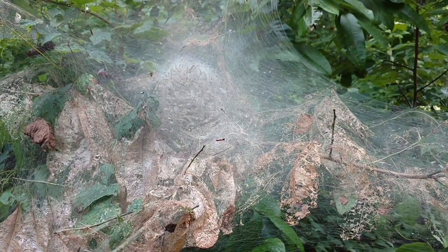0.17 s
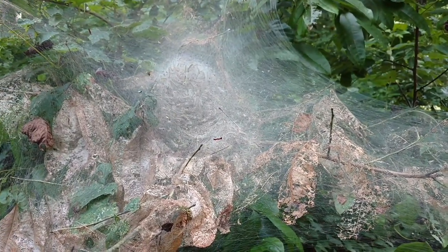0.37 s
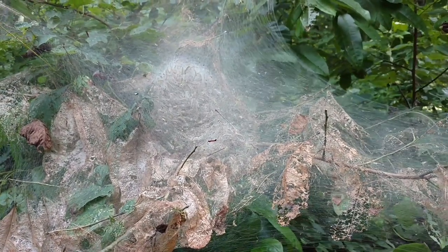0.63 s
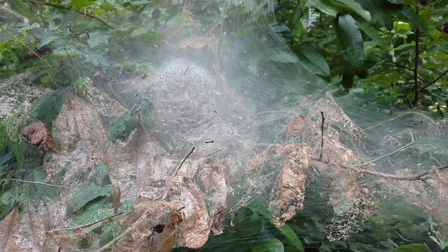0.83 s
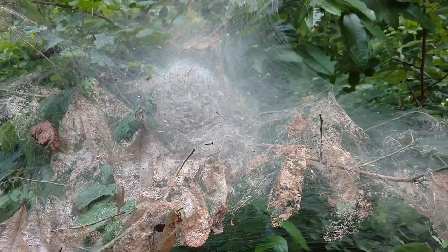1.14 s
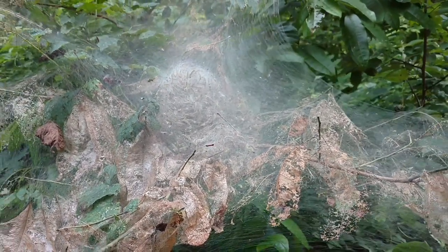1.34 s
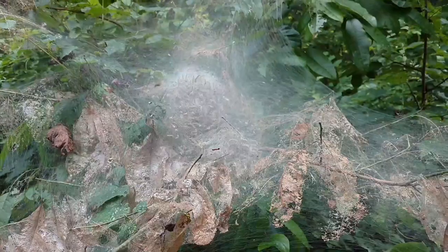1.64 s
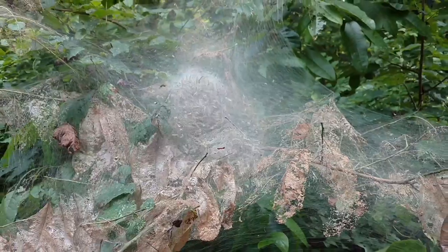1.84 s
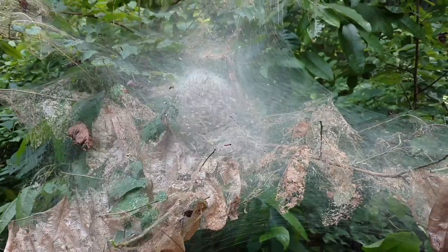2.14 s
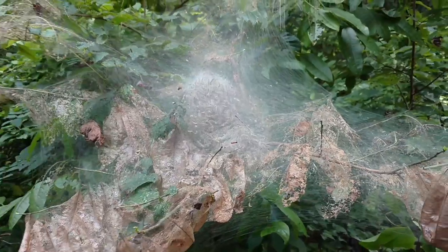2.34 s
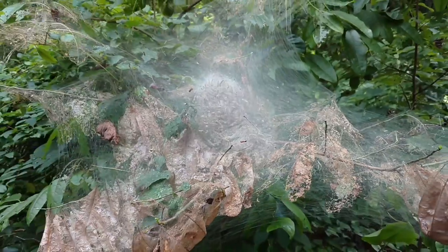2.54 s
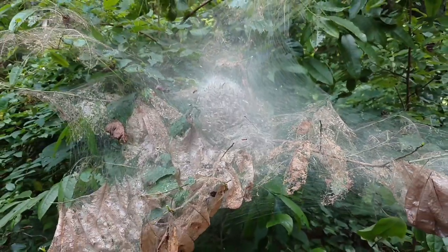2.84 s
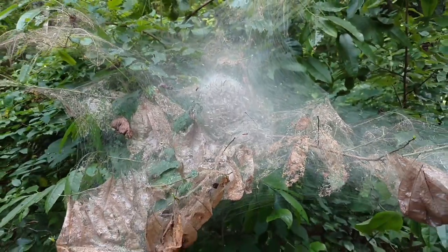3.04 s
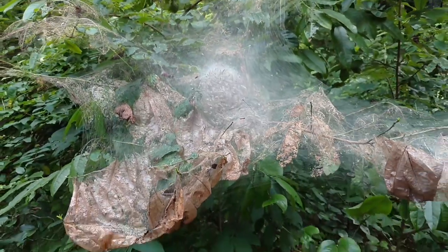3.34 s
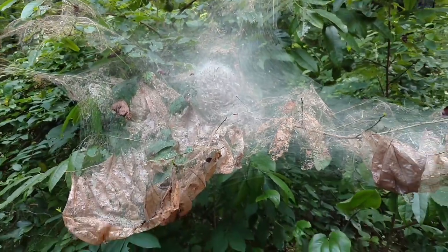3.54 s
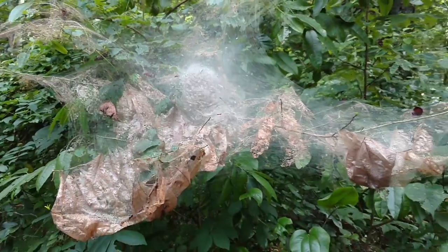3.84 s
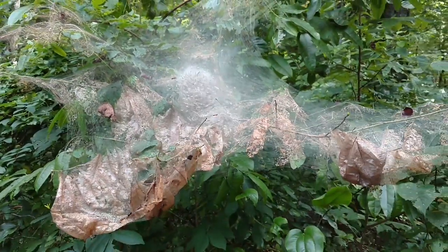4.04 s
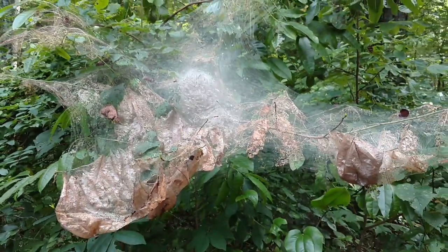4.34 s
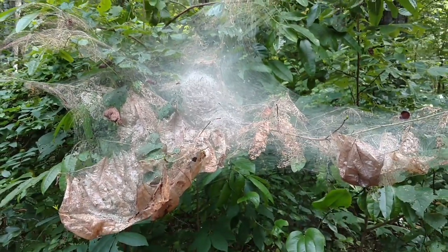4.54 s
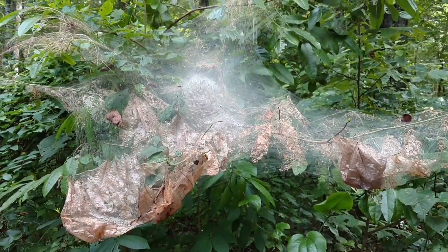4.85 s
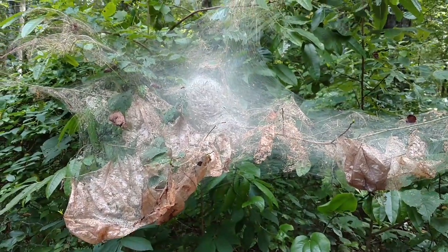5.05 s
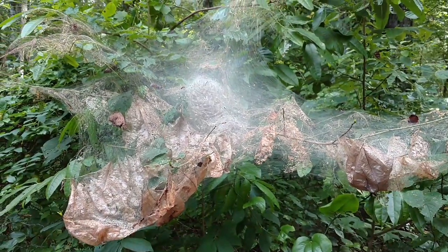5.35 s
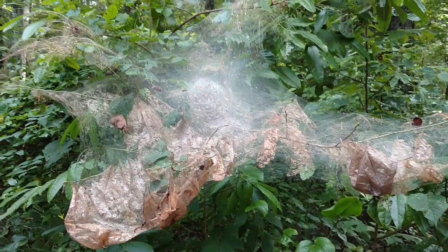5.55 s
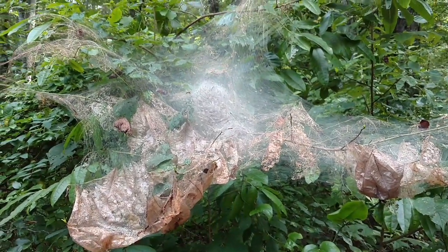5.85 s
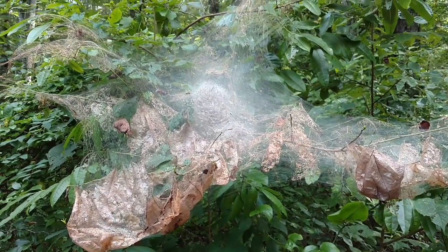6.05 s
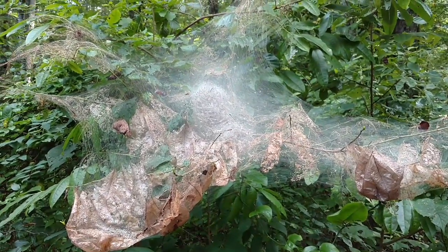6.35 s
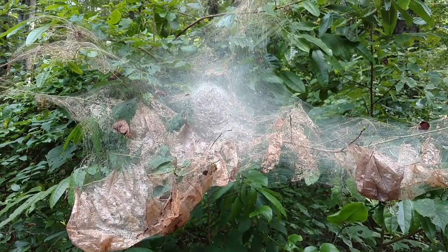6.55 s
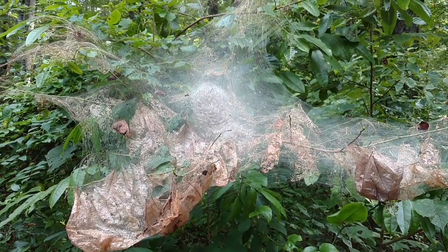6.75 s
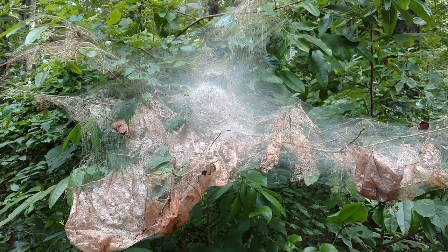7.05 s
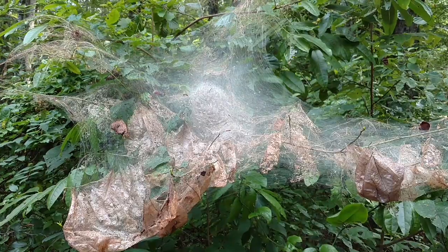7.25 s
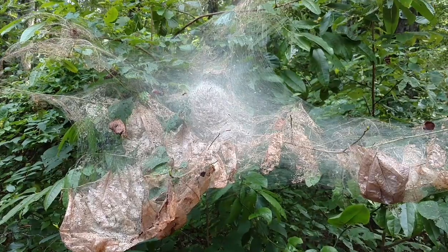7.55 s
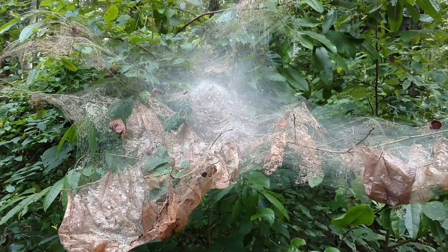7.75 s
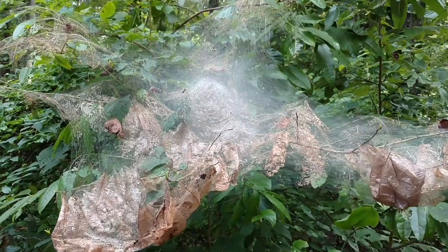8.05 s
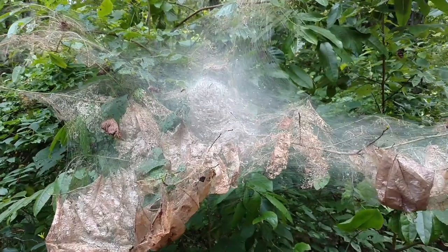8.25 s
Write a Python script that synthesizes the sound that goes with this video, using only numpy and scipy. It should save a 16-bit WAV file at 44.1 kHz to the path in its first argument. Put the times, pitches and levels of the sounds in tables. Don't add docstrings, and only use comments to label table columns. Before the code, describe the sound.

Outdoor stereo at close range: a deep, unsteady wasp buzz swells to its loudest around three seconds, keeps going in twitchy bursts, then weakens before one last jerk. Steady piercing cricket trilling sits left, quick chirping right, with distant crickets and hissing cicadas around. Tiny twig clicks and a cracking twig interrupt. Low wind rumble and blunt handling knocks come mid-way, with heavier thumps just before the end.

```python
import sys
import numpy as np
from scipy import signal
from scipy.fft import rfft, irfft
from scipy.io import wavfile

SR = 44100
rng = np.random.default_rng(int(sys.argv[2]) if len(sys.argv) > 2 else 0)


def log_audio(samples):
    frames = np.atleast_2d(samples).T
    limited = np.clip(frames, -1, 1)
    pcm = np.round(limited * 32767).astype(np.int16)
    wavfile.write(sys.argv[1], SR, pcm)


def volts_from_decibels(level):
    exponent = np.asarray(level, float) / 20
    return 10 ** exponent


N = 370440


def columns(rows):
    s, *rest = np.transpose(rows)
    return [np.interp(np.arange(N) / SR, s, c) for c in rest]


def at(curve, times_s):
    return curve[(times_s * SR).astype(int)]


def drift(rate_hz):
    r = np.exp(-20 * np.pi * rate_hz / SR)
    white = rng.standard_normal(N // 10 + 9002)
    slow = signal.lfilter([1], [1, -2 * r, r * r], white)[9000:]
    return np.interp(np.arange(N) / 10, np.arange(len(slow)), slow / slow.std())


def bumps(times_s, heights, halves_s):
    t = np.arange(0, N + 64, 64) / SR
    events = np.broadcast(times_s, heights, halves_s)
    total = sum(h * np.exp(-((t - s) / w) ** 2) for s, h, w in events)
    return np.interp(np.arange(N) / SR, t, total)


def ring(x, hz, t60_s):
    r = volts_from_decibels(-60 / (t60_s * SR))
    w = 2 * np.pi * hz / SR
    return signal.lfilter([0, np.sin(w)], [1, -2 * r * np.cos(w), r * r], x)


def band_pass(x, order, low_hz, high_hz):
    return signal.sosfilt(signal.butter(order, [low_hz, high_hz], "band", fs=SR, output="sos"), x)


def add(out, s, sound):
    i = max(round(s * SR), 0)
    out[i:i + len(sound)] += sound[:max(N - i, 0)]


def ports(x, lag, pan_db):
    turn = np.exp(-2j * np.pi * lag * np.arange(N // 2 + 1) / N)
    left = irfft(rfft(x) * turn, N)
    return np.array([left * volts_from_decibels(pan_db / 2), x * volts_from_decibels(-pan_db / 2)])


def flutter(band_hz):
    slow = rng.standard_normal((2, N // 20 + 502))
    slow = signal.sosfilt(signal.butter(4, band_hz, fs=SR / 20, output="sos"), slow)[:, 500:]
    a, b = (np.interp(np.arange(N) / 20, np.arange(len(v)), v / v.std()) for v in slow)
    return a + 1j * b


# time in s, effort in dB, strain in the threads as dB gained per multiple.
WINGS = [(0.0, -51, 3), (0.45, -47.5, 0.2), (1.0, -47, 2.5), (1.4, -49, 0.5), (2.2, -45, 1.3),
         (2.66, -46.5, -5), (2.71, -39, -1.8), (2.99, -38, 1.5), (3.4, -46, 2), (3.74, -43.5, 1.8),
         (4.12, -45, 0.5), (4.9, -45, 0.5), (5.3, -43, 0.2), (6.0, -43, -0.4), (6.45, -43, -1.8),
         (6.85, -44.5, -3), (7.2, -50, -4), (7.8, -53, -1.5), (8.2, -49.5, 4.4)]
# multiple of the wingbeat, level in dB, flutter in Hz.
WING_ORDERS = [(1.05, -0.5, 31), (1.96, -7.5, 38), (2.96, -17.5, 30), (3.95, -27, 45), (5., -40, 51)]
# time in s, extra effort in dB.
JERKS = [(.51, 7), (1.29, 2.5), (1.47, 6.5), (1.66, 3.5), (2.22, 3), (2.36, -3), (2.99, 1), (4.49, 3.5),
         (4.96, 6.5), (5.16, 4), (5.33, 2), (5.43, 1.5), (5.52, 6.5), (6.13, 2.5), (6.22, 4), (6.32, 4.5),
         (6.43, 0.5), (7.44, 3.5), (7.6, 5), (7.76, 4), (7.87, 11.5), (8.33, 1.5)]


def wasp():
    wingbeat_hz, brighter_db_per_db = 121.6, 0.0658
    jerk_half_s, uneven_db = 0.021, 0.94
    phase = 2 * np.pi * np.cumsum(wingbeat_hz * (1 + 0.02527 * drift(5.99))) / SR
    steady_db, strain_db = columns(WINGS)
    effort_db = steady_db + bumps(*np.transpose(JERKS), jerk_half_s) + uneven_db * drift(2.9)
    tilt_db = strain_db + brighter_db_per_db * (effort_db + 35.5)

    def harmonics():
        total = np.zeros(N)
        for multiple, level_db, band_hz in WING_ORDERS:
            gain_db = level_db + np.minimum(multiple - 1.5, 2.5) * tilt_db + 0.91 * drift(2.46)
            total += volts_from_decibels(gain_db) * (flutter(band_hz) * np.exp(1j * multiple * phase)).real
        return total

    effort = volts_from_decibels(effort_db + 6.0)
    direct = ports(effort * harmonics(), lag=5.2, pan_db=1.23)
    scattered = volts_from_decibels(-17.5) * effort * harmonics() * [[1], [-1]]
    return direct + scattered


def strokes(times_s, level_db, hz, length_s, crest, fall_hz, wobble_hz, wobble_db):
    out = np.zeros(N)
    u = np.linspace(0, 1, round(length_s * SR))
    swell = np.sin(np.pi * u ** 0.75) ** 1.2
    arch_hz = fall_hz * (.06 - (u - crest) ** 2)
    for s, top_db, (a, b, c) in zip(times_s, level_db, rng.standard_normal((len(times_s), 3))):
        pitch_hz = hz[min(round(s * SR), N - 1)] + wobble_hz * a + arch_hz
        tone = swell * np.sin(2 * np.pi * np.cumsum(pitch_hz) / SR + 3 * c)
        add(out, s - length_s / 2, volts_from_decibels(top_db + wobble_db * b) * tone)
    return out


# time in s, level in dB.
TRILL = [(0, -56), (0.61, -58), (0.93, -38.5), (1.6, -35.5), (1.85, -36.5), (2.15, -36), (2.4, -32.5),
         (2.5, -28.5), (2.75, -26), (3.1, -25.5), (3.59, -31.5), (4.1, -32.5), (5.5, -28.5), (6.9, -31),
         (7.92, -30), (8.4, -28)]
# time in s, stroke count.
STROKES = [(.122, 0), (.883, 16), (2.401, 48), (6.216, 128), (8.3535, 173), (8.397, 174)]


def near_cricket():
    trill_hz, trill_hz_per_db = 7892, 8.5
    s, count = np.transpose(STROKES)
    times = np.interp(np.arange(count[-1] + 1), count, s)
    level_db, = columns(TRILL)
    hz = trill_hz + trill_hz_per_db * (level_db + 32.5)
    song = strokes(times, at(level_db, times) - 5.5, hz, 0.017, crest=0.46, fall_hz=810,
                   wobble_hz=20, wobble_db=.7)
    clicks = np.full(N, 1e-18)
    for lead_s, click_db in ((0.014, -60), (0.0047, -61)):
        i = ((times - lead_s) * SR).astype(int)
        clicks[i] = volts_from_decibels(click_db + 6.4 * rng.standard_normal(len(i)))
    clicks = ring(ring(clicks, 11300, 0.0035), 10700, 0.002) / 8
    return ports(song, lag=2.2, pan_db=10.0) + ports(clicks, lag=0.79, pan_db=19.0)


CHIRP_GAP_S = .0197

# first stroke in s, last stroke in s, strokes.
RUNS = [(.009, .071, 4), (.127, .208, 5), (.26, .338, 5), (.4, .479, 5), (.535, .63, 6), (.67, .746, 5),
        (.8, .874, 5), (.936, 1.0, 4), (1.05, 1.13, 5), (1.18, 1.26, 5), (1.31, 1.389, 5), (1.44, 1.52, 5),
        (1.595, 1.675, 5), (1.707, 1.789, 5), (1.867, 1.928, 4), (1.982, 2.068, 5), (2.094, 2.176, 5),
        (2.208, 2.345, 8), (2.362, 2.535, 9), (2.553, 2.903, 19), (2.929, 3.031, 6), (3.061, 3.227, 9),
        (3.245, 3.303, 4), (3.333, 3.39, 4), (3.417, 3.473, 4), (3.5, 3.56, 4), (3.633, 3.693, 4)]
# last stroke of a chirp in s, chirp count.
CHIRPS = [(3.693, 26), (4.334, 31), (4.605, 33), (5.232, 38), (5.659, 41), (6.054, 44), (7.436, 55),
          (7.602, 56), (7.728, 57), (8.454, 62)]
# time in s, level in dB.
CHIRPER = [(0, -41), (.8, -35.5), (1.0, -53), (1.5, -43), (1.9, -32), (2.15, -41), (2.6, -41), (3.0, -33.5),
           (3.6, -38.5), (5, -42.5), (7.3, -37.5), (8.4, -32.5)]
# time in s, pitch in Hz.
CHIRPER_HZ = [(0, 7370), (.9, 7370), (1.6, 7280), (2.2, 7170), (3.6, 7170), (5, 7250), (8.4, 7230)]
# time in s, level in dB, pitch in Hz.
RETURN = [(0, -73, 6900), (1.4, -77, 7170), (1.9, -56, 7070), (3.1, -50.5, 7150), (3.9, -58.5, 7080),
          (5, -51, 6900), (7.4, -49.5, 7120), (8.4, -43, 7270)]


def chirper():
    chirp_rest_s = .03
    warm_up_s = 1.0
    s, count = np.transpose(CHIRPS)
    ends = np.interp(np.arange(count[0], count[-1] + 1), count, s)
    fits = np.round((np.diff(ends) - chirp_rest_s) / CHIRP_GAP_S)
    runs = [np.linspace(first, last, many) for first, last, many in RUNS]
    later = [end - CHIRP_GAP_S * np.arange(many) for end, many in zip(ends[1:], fits)]
    times = np.concatenate(runs + later)
    times = times[times < N / SR - .01]
    pitch_hz, = columns(CHIRPER_HZ)
    level_db, = columns(CHIRPER)
    top_db = at(level_db, times) - 6.0
    early = times < warm_up_s
    closing = strokes(times[early], top_db[early], pitch_hz - 40, .013, crest=.3, fall_hz=120,
                      wobble_hz=12, wobble_db=1.0)
    closing += strokes(times[~early], top_db[~early], pitch_hz, 0.0084, crest=0.01, fall_hz=800,
                       wobble_hz=40, wobble_db=3.0)
    back_db, back_hz = columns(RETURN)
    opening = strokes(times + 0.0071, at(back_db, times), back_hz, 0.009, crest=0.66, fall_hz=514,
                      wobble_hz=40, wobble_db=2.5)
    return ports(closing, lag=3.54, pan_db=-7.5) + ports(opening, lag=0.28, pan_db=0)


# time in s, level in dB, pitch in Hz.
RIVAL = [(0, -58, 7300), (.45, -61, 7300), (.7, -60, 7340), (2.0, -59, 7100), (3.1, -70, 6700),
         (3.6, -62, 7170), (4.6, -47, 7200), (5.2, -46, 7290), (6.0, -45.5, 7190), (6.5, -56, 7220),
         (7.5, -53, 7210), (8.4, -49, 7050)]


def rival():
    first_s, every_s = .035, .135
    ends = np.arange(first_s, N / SR, every_s)
    times = (ends[:, None] - CHIRP_GAP_S * np.arange(5)).ravel()
    times = times[times > .01]
    level_db, hz = columns(RIVAL)
    song = strokes(times, at(level_db, times), hz, 0.011, crest=0.22, fall_hz=710,
                   wobble_hz=40, wobble_db=2.0)
    return ports(song, lag=2.47, pan_db=-12.5)


# pitch in Hz, strokes per second, level in dB, port lag in samples.
CHORUS = [(6400, 48, -80, 3.), (6700, 52, -77, -2.), (7100, 44, -75, 4.), (7500, 57, -71, -4.),
          (7750, 50, -66, 2.5), (8150, 46, -70, -3.), (8500, 60, -78, 2.6)]


def chorus():
    out, t = 0, np.arange(N) / SR
    for hz, per_s, level_db, lag in CHORUS:
        throb = 1 + 0.88 * np.sin(2 * np.pi * np.cumsum(per_s * (1 + 0.0035 * drift(2.1))) / SR)
        band = (drift(190.0) + 1j * drift(110.0)) * np.exp(2j * np.pi * hz * t)
        out = out + ports(volts_from_decibels(level_db + 2.6 * drift(0.35)) * throb * band.real, lag, pan_db=0.5)
    return out


# time in s, level in dB.
CICADAS = [(0, -91), (1.5, -77), (3.2, -78), (3.9, -63), (6, -65.5), (8.4, -61)]


def cicadas():
    hiss = band_pass(rng.standard_normal((2, N)), 2, low_hz=2360, high_hz=6300)
    return volts_from_decibels(columns(CICADAS)[0] + 1.3 * drift(4.9)) * hiss / hiss.std()


# frequency in Hz, level in dB per Hz, likeness of the ports 0-1.
AIR = [(26.2, -80.5, 0), (237, -75, 0.94), (514, -89.5, 0.61), (880, -91.5, 0.59), (1720, -94.5, 0),
       (3040, -92.5, 0.04), (5870, -102, 0.01), (7870, -75.5, 0), (8750, -107, 1), (9630, -114, 0.5),
       (10200, -106, 0.05), (12100, -107, 0), (13700, -112, 0.2), (16600, -114, 1)]


def air():
    hz, level_db, alike = np.transpose(AIR)
    grid = np.log(np.arange(N // 2 + 1) * SR / N + 1)
    share = np.clip(np.interp(grid, np.log(hz), alike), 0, 1)
    both, left, right = rfft(rng.standard_normal((3, N))) * np.sqrt(SR / 2)
    own = np.array([volts_from_decibels(-3.5) * left, right])
    mix = np.sqrt(share) * both + np.sqrt(1 - share) * own
    shape = volts_from_decibels(np.interp(grid, np.log(hz), level_db))
    return irfft(shape * mix, N) * volts_from_decibels(.3 * drift(1.5))


# time in s, peak in dB, half length in s.
GUSTS = [(.45, -56, .05), (.97, -57, .17), (1.24, -58, .03), (1.63, -53, .06), (1.95, -50, .05),
         (3.05, -55, .08), (3.27, -44, .07), (3.47, -51, .12), (3.65, -48, .06), (3.84, -48, .07),
         (5.45, -55, .12), (6.25, -60, .07), (6.52, -61, .1), (7.88, -46, .05)]


def wind():
    calm_db, calm_swing_db = -69, 7
    white = rng.standard_normal((2, N))
    low = band_pass(white, 2, 55, 110)
    edge = band_pass(white, 1, 120, 300)
    lumps = volts_from_decibels(0.98 * np.array([drift(27), drift(17)]) + [[-15], [3]])
    s, peak_db, half_s = np.transpose(GUSTS)
    flow = volts_from_decibels(calm_db + calm_swing_db * drift(6.4)) + bumps(s, volts_from_decibels(peak_db), half_s)
    return volts_from_decibels(2.0) * flow * lumps * (low / low.std() + 0.19 * edge / edge.std())


KNOCK_T = np.arange(4000) / SR


def wood_side(wood):
    wood = signal.sosfilt(signal.butter(2, 700, "high", fs=SR, output="sos"), wood)
    return ports(wood, lag=1.6, pan_db=29.5)


# time in s, peak in dB.
SNAPS = [(0.6379, -34), (0.832, -33), (0.9712, -35), (1.5878, -35), (1.9654, -37), (2.0597, -48),
         (2.1799, -50), (3.3962, -36), (3.5369, -31), (3.5848, -36), (4.0143, -38), (4.0622, -33),
         (4.1086, -47), (4.8723, -33), (5.3477, -58), (5.3936, -31), (5.4914, -37), (6.2073, -32),
         (6.2614, -23), (6.6842, -35), (7.0115, -36), (7.0604, -35), (7.1556, -37), (7.7273, -50),
         (7.7737, -37)]


def snaps():
    wood = np.zeros(N)
    for s, peak_db in SNAPS:
        hz = 11350 + 310 * rng.standard_normal()
        burst = rng.standard_normal(len(KNOCK_T)) * np.exp(-KNOCK_T / 0.0045)
        snap = ring(burst, hz, 0.0012)
        add(wood, s, volts_from_decibels(peak_db - 25.5) * snap / abs(snap).max())
    return wood_side(wood)


# time in s, peak in dB, resonance in
# Hz, t60 in s, crack in dB.
TICKS = [
    (1.076, -42, 3040, 0.0014, -11),
    (1.388, -43, 1210, 0.0076, -26),
    (1.73, -56, 1680, 0.012, -12),
    (3.8426, -43, 1000, 0.001, -8),
    (4.312, -43.5, 880, 0.025, -19),
    (6.055, -43, 1170, 0.0039, -12),
    (7.22, -55.5, 1330, 0.012, -14),
]
TWIG = [
    (2.1786, -48, 2700, .003, -14),
    (2.1805, -37, 2000, .005, -12),
    (2.1809, -40, 4500, .005, -10),
    (2.1814, -42, 2600, .005, -3),
    (2.1853, -47, 3600, .005, -10),
]


def ticks():
    wood, t = np.zeros(N), KNOCK_T
    for s, peak_db, hz, t60_s, crack_db in TICKS + TWIG:
        burst = rng.standard_normal(len(t)) * np.exp(-t / 0.000097)
        body = ring(burst, hz, t60_s)
        body += .6 * ring(burst, 1.43 * hz, t60_s)
        body -= .4 * ring(burst, .72 * hz, t60_s / 2)
        crack = (t == 0) + 0.2 * rng.standard_normal(len(t)) * np.exp(-t / 0.016)
        crack = signal.lfilter([1], [1, -.55], crack)
        add(wood, s, volts_from_decibels(peak_db) * (body / abs(body).max() + volts_from_decibels(crack_db) * crack))
    return wood_side(wood)


# time in s, peak in dB, resonance in Hz, t60 in s.
THUMPS = [
    (3.645, -20, 152, 0.088),
    (3.796, -9.5, 200, 0.01),
    (3.842, -6.5, 171, 0.0053),
    (7.854, -36, 298, .03),
    (7.854, -4, 137, 0.05),
    (7.882, -4.5, 156, 0.059),
]


def thumps():
    housing = np.zeros(N)
    for s, peak_db, hz, t60_s in THUMPS:
        push = ring(np.exp(-KNOCK_T / 0.0001), hz, t60_s)
        add(housing, s, volts_from_decibels(peak_db - 16) * push / abs(push).max())
    return housing * [[1.3], [-.4]]


def scene():
    insects = wasp() + near_cricket() + chirper() + rival() + chorus() + cicadas()
    return insects + air() + wind() + snaps() + ticks() + thumps()


def roll_off(x):
    return signal.sosfilt(signal.butter(12, 15840, fs=SR, output="sos"), x)


def record(dry):
    cross_lag, cutoff_hz = 17, 15520
    other = np.roll(dry[::-1], cross_lag, axis=1)
    wide = dry - 0.66 * other
    wide = signal.sosfilt(signal.butter(2, 52, "high", fs=SR, output="sos"), wide)
    wide = signal.sosfilt(signal.ellip(12, .5, 50, cutoff_hz, fs=SR, output="sos"), wide)
    return roll_off(wide)


dry = scene()
out = record(dry)
log_audio(out)
```